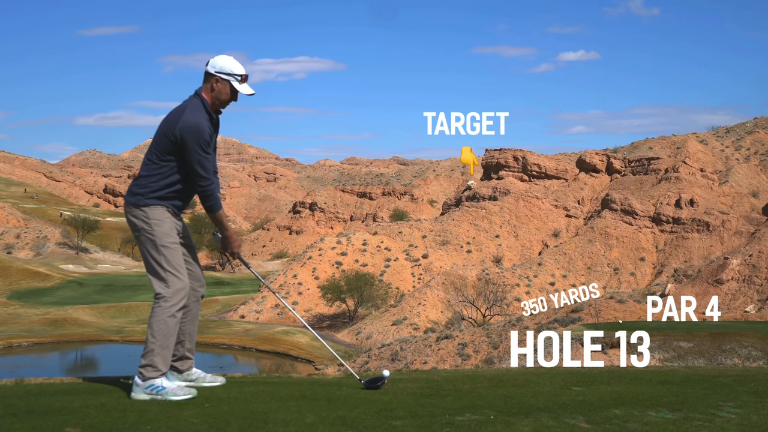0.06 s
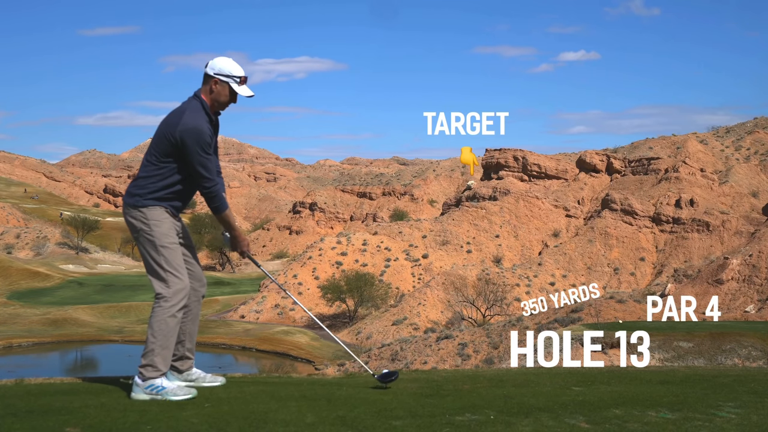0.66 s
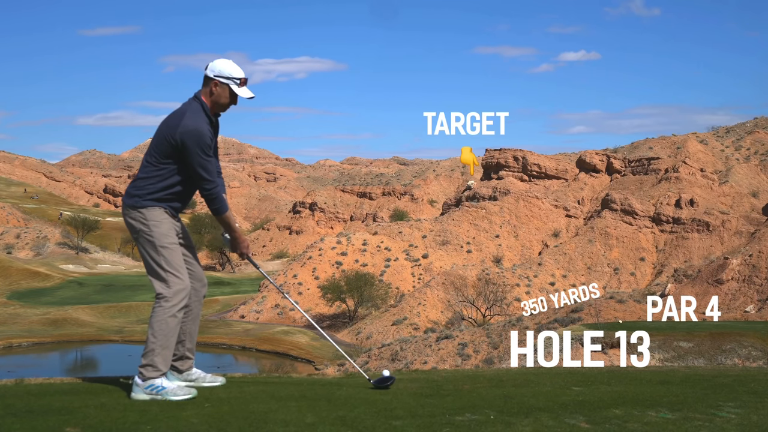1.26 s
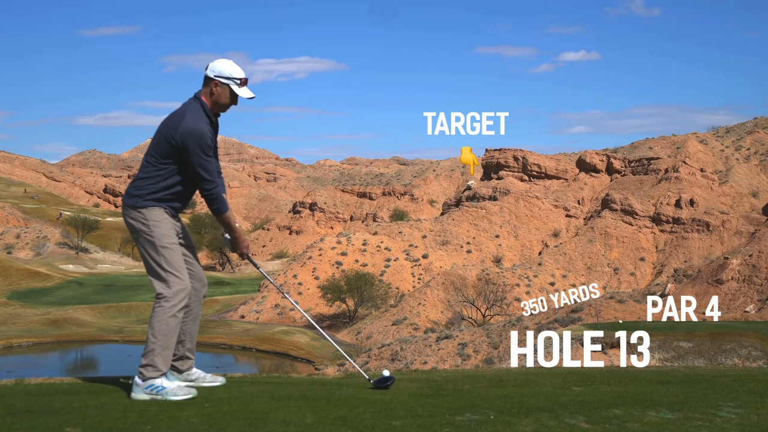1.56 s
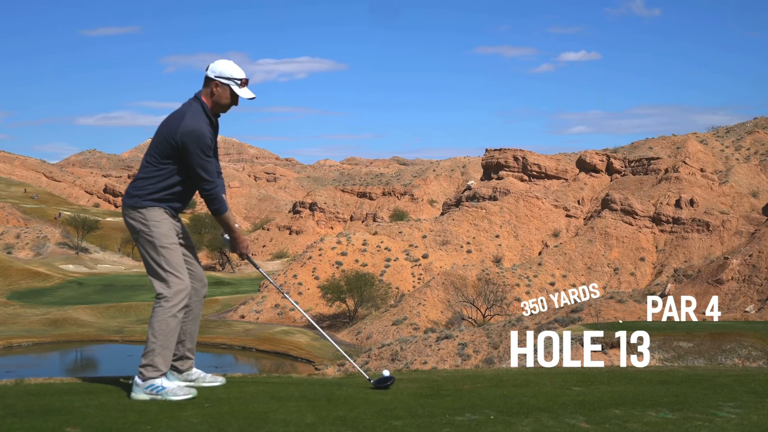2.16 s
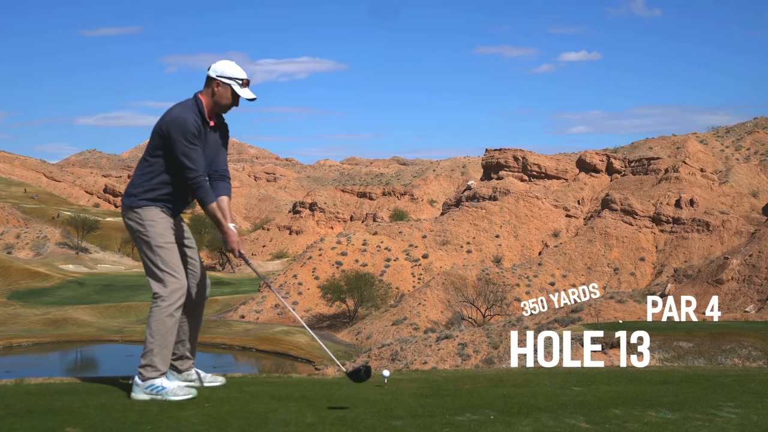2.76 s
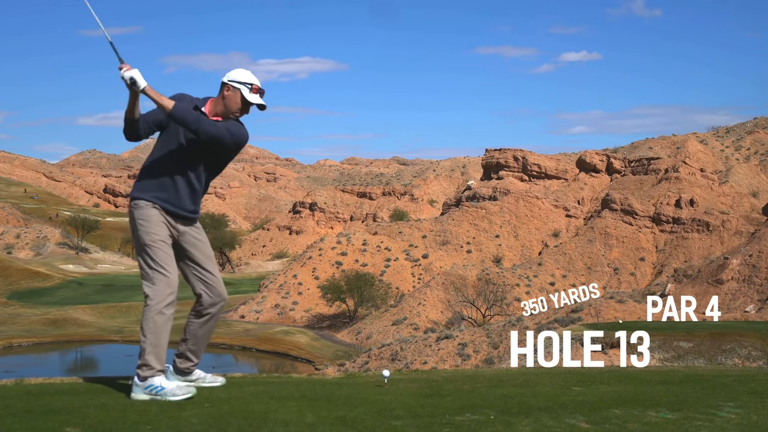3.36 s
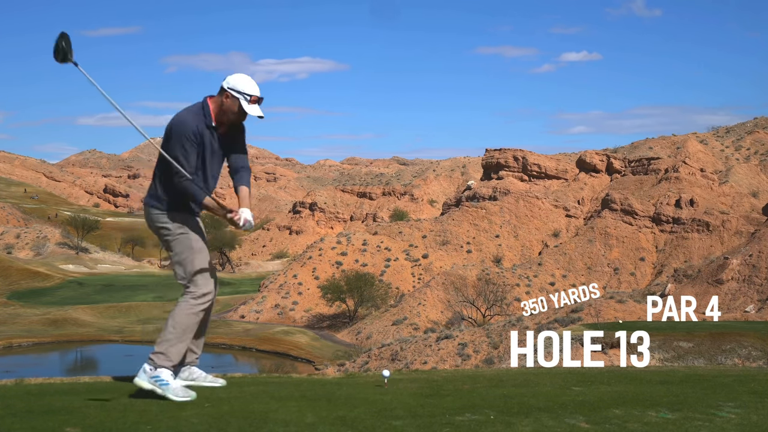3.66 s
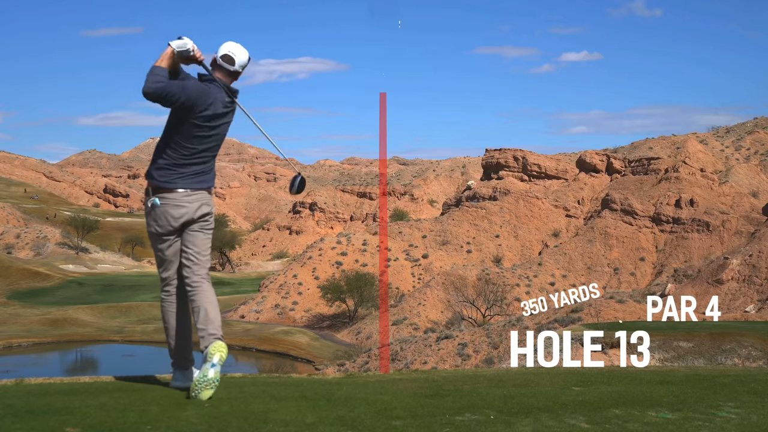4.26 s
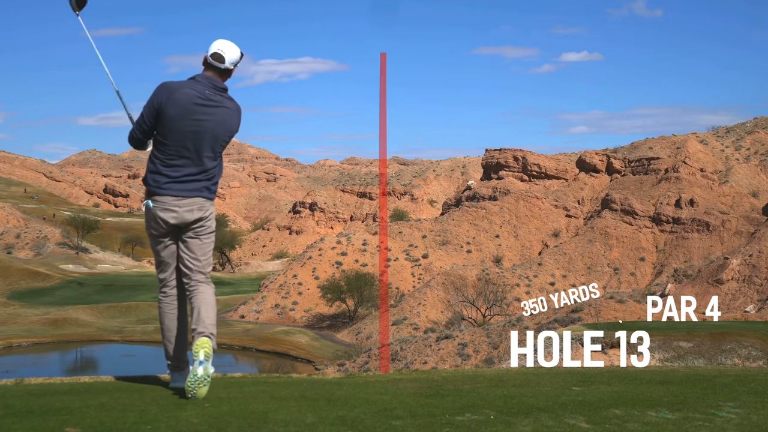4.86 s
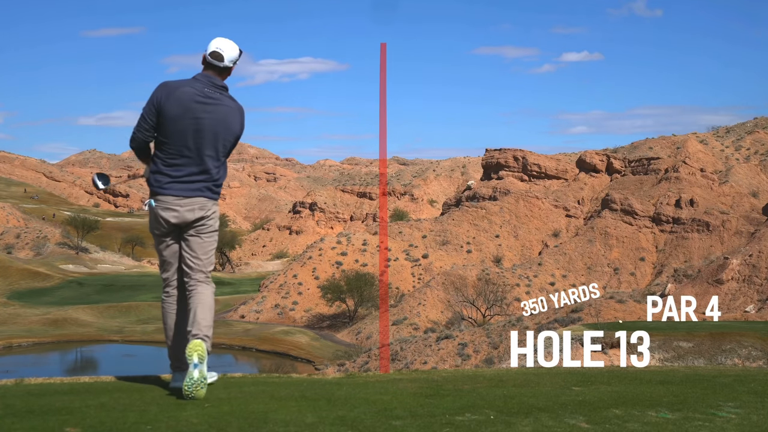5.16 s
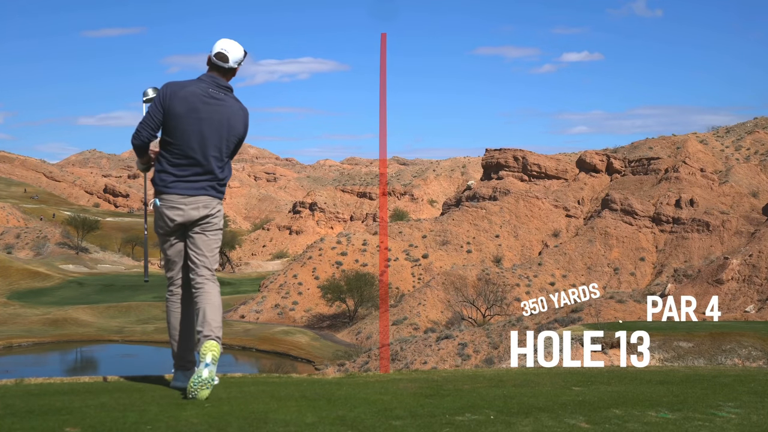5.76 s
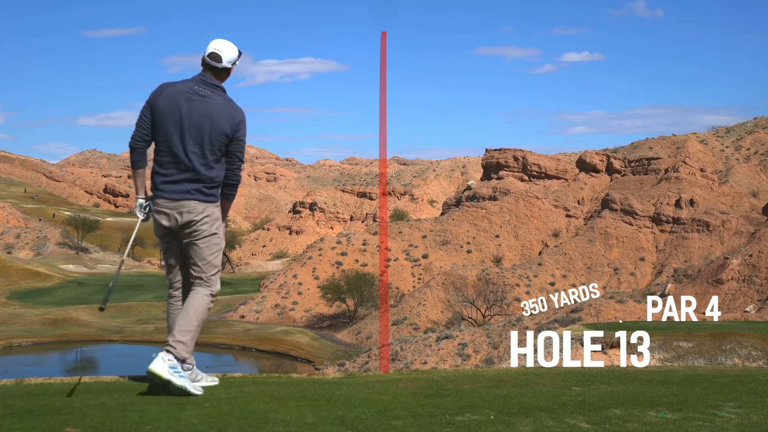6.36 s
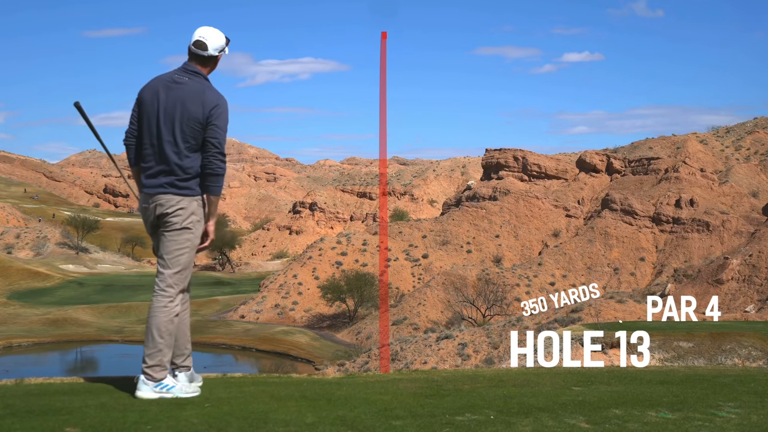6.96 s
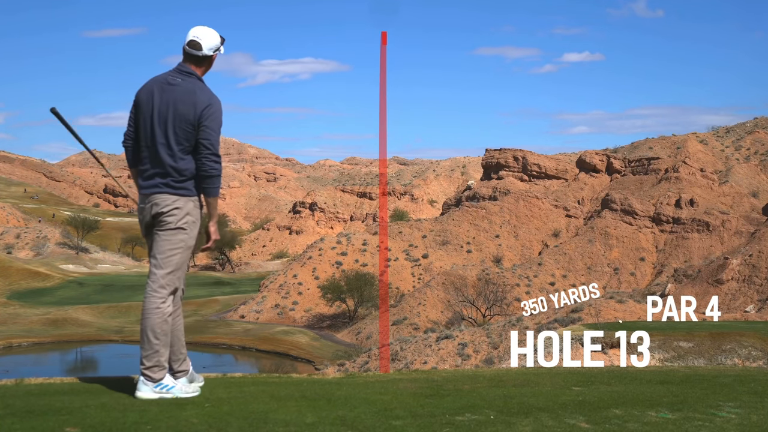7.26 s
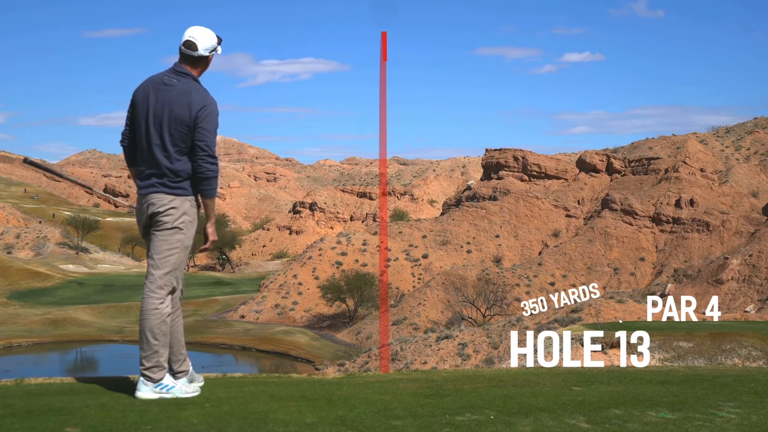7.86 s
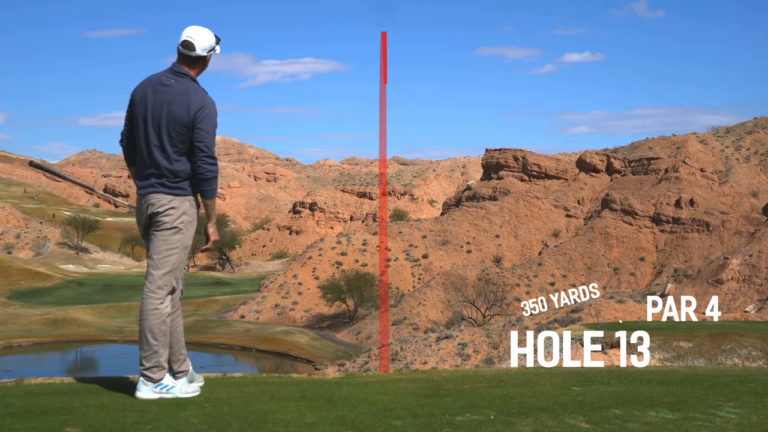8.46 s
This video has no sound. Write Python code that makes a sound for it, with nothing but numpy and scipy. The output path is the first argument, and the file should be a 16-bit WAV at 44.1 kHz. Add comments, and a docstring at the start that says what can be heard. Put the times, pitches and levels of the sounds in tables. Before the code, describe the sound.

On a quiet, open golf course, far engines drone over a low rumble while a small bird chirps softly. Close to the microphone, a driver swishes through the air and hits the ball with one loud, sharp metallic crack. The ball hisses away and rocky bluffs send back a faint echo. The golfer's shoes and clothes tick and rustle lightly, and the bird sings again near the end.

```python
"""A golf tee among desert bluffs, one microphone near the golfer. A driver's shaft swishes, the hollow
metal head cracks on the ball and its ring rises in pitch as it swings round; the ball hisses away,
the turf scatters the crack and the bluffs answer faintly. Close by, shoes and clothes tick and rustle.
A small bird sings softly, and far engines drone over a low rumble and a wash of distant air."""
import sys
import numpy as np
from scipy import signal
from scipy.fft import rfft, irfft, next_fast_len
from scipy.io import wavfile
from scipy.ndimage import map_coordinates

SR = 44100
rng = np.random.default_rng(int(sys.argv[2]) if len(sys.argv) > 2 else 0)


def generate_wav(sig):
    """Save sig (samples, or channels by samples) to the path in sys.argv[1] as 16-bit PCM at SR."""
    pcm = np.round(np.clip(np.atleast_2d(sig).T, -1, 1) * 32767).astype(np.int16)
    wavfile.write(sys.argv[1], SR, pcm)


N = 375291
T = np.arange(N) / SR
AGE = np.arange(SR // 2) / SR  # seconds since the start of a short sound
IMPACT_S = 3.5422


def amp(db):
    """Decibels to gain."""
    return 10 ** (np.asarray(db) / 20)


def unit(x):
    """Scales to rms 1."""
    return x / np.sqrt(np.mean(x ** 2) + 1e-20)


def bell(x, middle, width):
    """A smooth swell of height 1."""
    return np.exp(-((x - middle) / width) ** 2)


def follow(rows, t):
    """Each column of a curve at times t."""
    times, *columns = np.transpose(rows)
    return [np.interp(t, times, column) for column in columns]


def colour(points, hz):
    """Gain of a spectrum at the given frequencies."""
    f, db = np.transpose(points)
    return amp(np.interp(np.log(hz + 1), np.log(f), db))


def shaped(x, points):
    """Filters x by a spectrum."""
    size = next_fast_len(len(x))
    return irfft(rfft(x, size) * colour(points, np.fft.rfftfreq(size, 1 / SR)), size)[:len(x)]


def noise(points):
    """Steady noise of a given spectral shape, rms 1."""
    return unit(shaped(rng.standard_normal(N), points))


def wander(hz):
    """Smooth random drift up to about the given rate, rms 1."""
    size = next_fast_len(N)
    lowpass = np.exp(-(np.fft.rfftfreq(size, 1 / SR) / hz) ** 2)
    return unit(irfft(rfft(rng.standard_normal(size)) * lowpass, size)[:N])


def blurred_tone(hz, blur_hz):
    """A tone of wavering strength and phase, rms 1."""
    phase = 2 * np.pi * np.cumsum(hz * np.ones(N)) / SR
    return wander(blur_hz) * np.sin(phase) + wander(blur_hz) * np.cos(phase)


def moving_noise(gain, size=256):
    """Noise whose spectral shape is gain(Hz, s), kept near rms 1."""
    frames = dict(nperseg=size, noverlap=size * 3 // 4)
    hz, t, spectra = signal.stft(rng.standard_normal(N), SR, **frames)
    gains = gain(hz[:, None], t[None])
    return signal.istft(spectra * gains / np.sqrt((gains ** 2).mean(0)), SR, **frames)[1][:N]


def click(points, size=4096):
    """A minimum-phase click of a given spectral shape, peak 1."""
    log_gain = np.log(colour(points, abs(np.fft.fftfreq(size, 1 / SR))))
    pulse = np.fft.ifft(np.exp(signal.hilbert(log_gain).conj())).real
    return pulse / abs(pulse).max()


def add(mix, s, sound):
    """Mixes a sound in at s seconds."""
    part = mix[round(s * SR):][:len(sound)]
    part += sound[:len(part)]


def strike(speed_m_s=45, arc_rad=2.9, slowing_s=.13, thwack_db=6, rebound_db=-14, rebound_s=.0038):
    """The ball thwacks the face, and the hollow head rings while it swings on."""
    # modes of the head as heard at impact: f/Hz, level/dB, t60/s
    head_modes = [(2005, -37, .27), (3960, -24, .115), (2710, -13, 0.048), (2860, -20, .03),
                  (3540, -7.5, .028), (4200, -12, .045), (4450, -22, .03), (4640, -9, 0.048),
                  (5070, -8, .035), (5590, -8, .04), (5995, -13, .033), (6300, -17.5, .025),
                  (7365, -10.5, .025), (7875, -1.5, .016), (10000, -18, .015), (12100, -16.5, .015),
                  (13950, -23.5, 0.018)]
    # spectrum of the noise in the snap and clang: f/Hz, level/dB
    burst_spectrum = [(100, -24), (300, -9), (1000, -11), (1600, -10.5), (2100, -14.5), (3000, -2),
                      (4500, -2), (6000, 0), (8500, -5.5), (13000, -6), (15500, -13), (17000, -35)]
    # spectrum of the ball's contact: f/Hz, level/dB
    thwack = [(25, -60), (60, -40), (150, -17), (280, -6.5), (600, -5), (1100, -2.5), (1650, -4),
              (2100, -14.5), (4000, -29.5), (9000, -51)]
    snap_db, snap_t60, clang_db, clang_t60 = -2, .011, -19, .07
    # the head first flees the microphone, then turns upward: its pitch rises
    angle = arc_rad * (1 - np.exp(-AGE / slowing_s))
    doppler = (343 + speed_m_s) / (343 + speed_m_s * np.cos(angle))
    clock = np.cumsum(doppler) / SR
    ring = sum(amp(db - 60 * AGE / t60) * np.sin(2 * np.pi * (hz * clock + rng.random()))
               for hz, db, t60 in head_modes)
    ring += crown(clock)
    # a brief broadband snap opens the crack; a duller clang lingers
    burst = noise(burst_spectrum)[:len(AGE)]
    ring += amp(snap_db - 60 * AGE / snap_t60) * burst
    ring += amp(clang_db - 60 * AGE / clang_t60) * shaped(burst, [(6000, .5), (11000, -6)])
    ring *= np.minimum(AGE / .00013, 1) ** 2  # the ring builds while the ball is on the face
    add(ring, 0, -amp(thwack_db) * click(thwack))
    add(ring, rebound_s, amp(rebound_db) * click(thwack))  # thrown back by the ground near the tee
    out = np.zeros(N)
    add(out, IMPACT_S, ring)
    return out


def crown(clock, hz=2560, level_db=3, t60=.087, beat_hz=122, twin_db=-13):
    """The head's loudest mode beats with a close twin while its beam swings past the microphone."""
    facing_s, turn_s, averted_db = .0165, .005, -13
    lobe_top_s, lobe_period_s, lobe_db = .029, .026, 3.5
    beam_db = averted_db * (1 - np.tanh((AGE - facing_s) / turn_s)) / 2
    side_lobes_db = lobe_db * np.cos(2 * np.pi * (AGE - lobe_top_s) / lobe_period_s)
    flutter_db = wander(150)[:len(AGE)]
    gain = amp(level_db - 60 * AGE / t60 + beam_db + side_lobes_db + flutter_db)
    twin = amp(twin_db) * np.sin(2 * np.pi * (hz + beat_hz) * clock)
    return gain * (np.sin(2 * np.pi * hz * clock) + twin)


def swish(full_speed_db=-36.5, db_per_doubling=17, whistle_hz=5778, pass_s=3.509, push_hz=180):
    """The shaft's eddies rise with its speed; the passing head shoves the air and trails a wake."""
    # the swing: t/s, club speed/share of the fastest
    swing = [(3.3, .12), (3.41, 0.22), (3.441, .35), (3.47, 0.65), (3.483, 0.88), (3.512, 1), (3.545, .9),
             (3.6, 0.53), (3.7, 0.11)]
    # spectrum of the eddies at full speed: f/Hz, level/dB
    eddy_spectrum = [(60, -26), (150, -13), (350, -11), (800, -8), (1900, -12.5), (3000, -15.5),
                     (5500, -15), (8000, -24), (12000, -31), (16000, -39)]
    # spectrum of the air behind the head: f/Hz, level/dB
    wake_spectrum = [(60, -15), (150, 0), (400, -1), (900, -6), (2000, -11), (4000, -30)]
    speed = follow(swing, T)[0]
    swinging = (T > swing[0][0]) * (T < swing[-1][0])
    eddies = moving_noise(lambda hz, t: colour(eddy_spectrum, hz / follow(swing, t)[0]))
    eddies *= amp(full_speed_db + db_per_doubling * np.log2(speed)) * swinging
    # the eddy tone is clear only near a third of full speed, before the flow breaks up
    smooth_flow = bell(np.log2(speed), np.log2(.34), .45) * (T < IMPACT_S)
    whistle = amp(-57.5) * smooth_flow * blurred_tone(whistle_hz * speed, blur_hz=200)
    push = amp(-31) * bell(T, pass_s, .009) * np.sin(2 * np.pi * push_hz * (T - pass_s))
    wake = amp(-37.5) * bell(T, pass_s + .009, .019) * noise(wake_spectrum)
    return eddies + whistle + push + wake


def ball(level_db=-50, near_s=.09, fade_db_per_s=9, dulling_db_per_khz_s=1.53, ground_gain=.43):
    """The spinning ball hisses away; its ground echo lags more as it climbs, sweeping a comb down."""
    # spectrum of the ball leaving the tee: f/Hz, level/dB
    spectrum = [(150, -15), (500, -5.5), (1500, -5), (3000, -5), (6000, -10), (9000, -21.5), (15000, -17.5)]
    flight_s = np.maximum(T - IMPACT_S, 0)
    hiss = moving_noise(lambda hz, t: colour(spectrum, hz)
                        * amp(-dulling_db_per_khz_s * hz / 1000 * np.clip(t - IMPACT_S, 0, 2)))
    hiss *= (flight_s > 0) * amp(level_db - fade_db_per_s * flight_s) / (1 + flight_s / near_s)
    lag_s = .0004 + .0019 * flight_s
    return hiss + ground_gain * map_coordinates(hiss, [(T - lag_s) * SR], order=3)


def turf(level_db=-46, t60=.55):
    """The ground around the tee scatters the crack into a short dull tail."""
    # spectrum of the tail: f/Hz, level/dB
    spectrum = [(50, -6), (120, 0), (300, -4), (700, -10), (2000, -15), (4000, -29), (9000, -45)]
    since = np.maximum(T - IMPACT_S, 0)
    return (since > 0) * amp(level_db - 60 * since / t60) * noise(spectrum)


def bluffs(crack, doppler=1.16, treble_db_per_s=-9):
    """Rough rock faces send the crack back late, smeared and duller the farther off they stand."""
    # echoes reaching the microphone: t/s, level/dB, spread/s
    echoes = [(3.76, -52, 0.0081), (3.791, -52.5, 0.033), (3.97, -53, 0.036), (4.027, -49.5, 0.01),
              (4.158, -53, .008), (4.174, -54, 0.014), (4.226, -53.5, 0.012), (4.243, -51, 0.015),
              (4.286, -53.5, .012)]
    # colour of the long way through the air: f/Hz, gain/dB
    air_path = [(200, 14), (700, -8), (1500, 0), (3000, 2.5), (4400, -0.5), (6000, -37), (12000, -35)]
    # the head moves toward the bluffs, so they receive a higher pitch
    sent = np.interp(IMPACT_S + doppler * AGE, T, crack)
    paths = np.zeros(N)
    for s, db, spread_s in echoes:
        scatter = rng.standard_normal(len(AGE)) * np.exp(-AGE / spread_s)
        dulling = [(1800, 0), (3000, treble_db_per_s * (s - IMPACT_S))]
        add(paths, s, shaped(amp(db) * scatter / np.linalg.norm(scatter), dulling))
    return shaped(signal.fftconvolve(paths, sent)[:N], air_path)


def golfer(grain_db=1.3, scuff_s=4.387, scuff_db=-62, tick_octaves=1.1):
    """Near the microphone, cloth rustles, a shoe pivots on the turf, and shoes, grip and clothes tick."""
    # body movements: middle t/s, half length/s, level/dB
    moves = [(3.049, .3, -87), (3.6, .45, -75), (4.401, 0.44, -83), (5.42, 0.28, -83), (6.25, 0.29, -80.5),
             (6.78, .15, -83)]
    # spectrum of rubbing cloth: f/Hz, level/dB
    cloth = [(300, -10.5), (1500, 0.5), (3500, -1), (6500, -3.5), (10000, -14.5), (15000, -23)]
    # spectrum of the shoe's scuff: f/Hz, level/dB
    scuff = [(400, -12), (1200, -10), (1500, -1), (1750, -15), (3000, -19), (8000, -50)]
    # small ticks: t/s, level/dB, centre f/Hz, decay/s
    ticks = [(3.254, -53, 2700, .0015), (3.418, -65, 5000, .002), (4.584, -56.5, 1300, .002),
             (4.658, -60, 1700, .002), (4.716, -53.5, 750, .0045), (4.836, -51.5, 600, .003),
             (5.018, -54, 650, .003), (5.114, -72, 4500, .006), (5.141, -66, 4000, .0044),
             (5.16, -60, 3500, .0025), (5.239, -65, 5000, .003), (5.408, -63.5, 3200, .013),
             (5.429, -70, 3500, .01), (5.937, -65, 6000, .002), (6.015, -65, 2500, .0017),
             (6.169, -62.5, 1500, 0.0039), (6.833, -69, 2513, .002), (7.119, -65, 2200, .002),
             (7.773, -63, 2200, .002)]
    # softening of the ticks by cloth and turf: f/Hz, gain/dB
    muffle = [(5500, 6), (12000, -12)]
    motion = sum(amp(db) * bell(T, s, half_s) for s, half_s, db in moves)
    out = motion * amp(grain_db * wander(40)) * noise(cloth)
    out += amp(scuff_db) * bell(T, scuff_s, .03) * noise(scuff)
    hz = np.fft.rfftfreq(len(AGE), 1 / SR) + 1
    for s, db, centre_hz, decay_s in ticks:
        band = np.exp(-(np.log2(hz / centre_hz) / tick_octaves) ** 2 / 2)
        burst = irfft(rfft(rng.standard_normal(len(AGE))) * band * colour(muffle, hz))
        add(out, s, amp(db) * unit(burst) * np.exp(-AGE / decay_s))
    return out


def glide(length_s, from_hz, to_hz, bend=1, ease=1, waver=.021, waver_s=.004):
    """One near-pure whistle of the bird, sliding between two pitches as it swells and fades."""
    progress = np.linspace(0, 1, round(length_s * SR))
    drift = np.interp(progress * length_s / waver_s, np.arange(64), rng.standard_normal(64))
    slide = 1 - (1 - progress ** bend) ** ease
    hz = (from_hz + (to_hz - from_hz) * slide) * (1 + waver * drift)
    return np.sqrt(abs(np.sin(np.pi * progress))) * np.sin(2 * np.pi * np.cumsum(hz) / SR)


def bushes(x, scatter_db, scatter_s=.071):
    """Bushes and rocks add a short scatter on the way to the microphone."""
    tail = rng.standard_normal(len(AGE)) * np.exp(-AGE / scatter_s)
    return x + amp(scatter_db) * signal.oaconvolve(x, tail / np.linalg.norm(tail))[:N]


def bird_arches(low_hz=2647, leap_s=.025, break_s=.005, resume=.93):
    """Before the swing, the bird's whistle leaps up, breaks off at the top and falls back."""
    # arched notes: top t/s, top f/Hz, level/dB, fall/s
    notes = [(1.174, 3530, -74.5, .024), (1.34, 3300, -65, 0.026), (1.482, 3800, -64.5, 0.033),
             (1.631, 3580, -62.5, 0.019), (1.782, 3790, -60.5, 0.021), (1.929, 3650, -61, 0.02),
             (2.096, 3470, -63.5, 0.026), (2.236, 3370, -65, 0.032)]
    out = np.zeros(N)
    for s, top_hz, db, fall_s in notes:
        add(out, s - leap_s, amp(db) * glide(leap_s, low_hz, top_hz, bend=1.72))
        add(out, s + break_s, amp(db) * glide(fall_s, resume * top_hz, low_hz, bend=.9))
    return bushes(out, scatter_db=-12)


def bird_twitter(low_hz=2520, half_s=.028, break_s=.005, pip_s=.02336):
    """After the shot, a soft run of rounded notes, each broken at its top, then a few level pips."""
    # quick rolling notes: top t/s, top f/Hz, level/dB
    notes = [(4.32, 3700, -74.5), (4.385, 3500, -73), (4.445, 3550, -70.5), (4.5, 3600, -69),
             (4.56, 3750, -71), (4.62, 3800, -71), (4.68, 3800, -73), (4.745, 3650, -79)]
    # soft pips: t/s, f/Hz, level/dB
    pips = [(4.92, 3810, -78.5), (5.101, 3860, -77), (5.27, 3796, -77), (5.47, 3826, -75)]
    out = np.zeros(N)
    for s, top_hz, db in notes:
        add(out, s - half_s, amp(db) * glide(half_s - break_s, low_hz, top_hz, waver=.04))
        add(out, s + break_s, amp(db) * glide(half_s, top_hz, low_hz, waver=.04))
    for s, hz, db in pips:
        add(out, s - pip_s / 2, amp(db) * glide(pip_s, hz, hz))
    return bushes(out, scatter_db=-7)


def bird_slurs(lead_s=.052, pip_s=.021, pip_hz=3480, pip_db=-7, flick_s=.0073, dip_db=-9, knee=.83):
    """Each late note is a soft pip, a dip and flick to the top, then a long slide from the knee."""
    # slurred notes: top t/s, top f/Hz, level/dB, slide/s, end f/Hz
    notes = [(7.569, 4513, -66.5, 0.038, 2880), (7.714, 4530, -66, 0.042, 2870),
             (7.858, 4700, -65.5, 0.047, 3000), (7.993, 4840, -61.5, 0.042, 2900),
             (8.129, 4830, -63.5, 0.04, 2890), (8.258, 4810, -63.5, 0.045, 2870),
             (8.4, 4650, -63.5, 0.051, 2720)]
    out = np.zeros(N)
    for s, top_hz, db, slide_s, end_hz in notes:
        knee_hz = knee * top_hz
        add(out, s - lead_s, amp(db + pip_db) * glide(pip_s, pip_hz, pip_hz))
        add(out, s - 2 * flick_s, amp(db + dip_db) * glide(flick_s, top_hz, pip_hz))
        add(out, s - flick_s, amp(db) * glide(flick_s, pip_hz, top_hz, bend=1.5))
        add(out, s, amp(db) * glide(flick_s / 2, top_hz, knee_hz))
        add(out, s + flick_s / 2, amp(db) * glide(slide_s, knee_hz, end_hz, ease=1.5))
    return bushes(out, scatter_db=-16.5)


def engine(curve, orders, flutter_db):
    """Only the low orders of a far engine carry to the tee, each fluttering in the moving air."""
    hz, level_db = follow(curve, T)
    cycles = np.cumsum(hz) / SR
    out = np.zeros(N)
    for multiple, db in orders:
        gain = amp(level_db + db + flutter_db * wander(3.99))
        out += gain * np.sin(2 * np.pi * (multiple * cycles + rng.random()))
    return np.sqrt(2) * out


def far_engines():
    """Out on the course one engine drones on, a mower fades away and a cart comes into earshot."""
    # the droning engine: t/s, firing f/Hz, level/dB
    drone = [(0.0, 54.2, -55.5), (0.37, 54.55, -52.5), (1.35, 58.4, -54.5), (3.16, 59.83, -53),
             (4.94, 57.1, -51.5), (6.6, 50.5, -57), (8.4, 47.46, -57.5)]
    # the mower's and the cart's engines: t/s, cycle f/Hz, level/dB
    mower = [(0, 20.5, -57), (1.2, 21.3, -54), (2.2, 21.2, -61), (3.2, 20.2, -75), (8.5, 20, -95)]
    cart = [(0, 18.5, -85), (2.8, 18.5, -61), (4.6, 18.3, -60.5), (5.9, 17.5, -62), (7.4, 19.4, -62.5),
            (8.5, 19, -65)]
    # orders of each engine: multiple of its f, relative level/dB
    drone_orders = [(1, 0), (2, -11)]
    mower_orders = [(5, -1), (6, -12), (7, -7), (8, -8), (9, -16), (10, -11)]
    cart_orders = [(5, -3), (7, -8), (8, -6), (9, -9), (10, -7), (12, -13)]
    return (engine(drone, drone_orders, flutter_db=.8)
            + engine(mower, mower_orders, flutter_db=1.8)
            + engine(cart, cart_orders, flutter_db=1.8))


def far_whines():
    """Blurred tones of far machinery drift in and out."""
    # whining tones: start t/s, end t/s, f/Hz, blur/Hz, level/dB
    tones = [(.8, 2.3, 667, 14, -69.5), (0, 3.5, 660, 25, -77), (.8, 2.4, 472, 10, -75),
             (0, 2.1, 1000, 50, -76), (0, 3.3, 1335, 30, -82), (6.3, 7.5, 770, 10, -78),
             (7.5, 7.75, 720, 15, -76)]
    out = np.zeros(N)
    for start, end, hz, blur_hz, db in tones:
        progress = np.clip((T - start) / (end - start), 0, 1)
        swell = np.sqrt(abs(np.sin(np.pi * progress)))
        out += amp(db) * swell * blurred_tone(hz, blur_hz)
    return out


def air(rumble_db=-60, rumble_fall_db_per_s=.34, gust_s=7.82, hiss_db=-88, hiss_rise_db_per_s=1):
    """A lumpy rumble, swelled by one puff of wind, lies under a distant wash and a faint growing hiss."""
    # spectra of the low rumble, the distant wash and the high hiss: f/Hz, level/dB
    rumble_spectrum = [(20, -35), (32, -13), (45, 0.5), (70, 2.5), (100, -2), (160, -4.5), (220, -7),
                       (320, -15.5), (600, -54.5)]
    wash_spectrum = [(100, -10), (300, 1.5), (500, -1), (900, -5), (1400, -10.5), (2500, -18.5),
                     (3600, -27), (6000, -35), (12000, -56.5)]
    hiss_spectrum = [(900, -25), (1800, -1), (2800, -1.5), (3600, -13), (6000, -29)]
    # slow course of the wash: t/s, level/dB
    wash_level = [(0, -65.5), (1.4, -65), (3, -67.5), (5.7, -66.5), (6.7, -70.5), (8.5, -70)]
    gust_db = 4.5 * bell(T, gust_s, .15)
    lumps_db = 1.8 * wander(6)
    rumble = amp(rumble_db - rumble_fall_db_per_s * T + gust_db + lumps_db) * noise(rumble_spectrum)
    wash = amp(follow(wash_level, T)[0] + .77 * wander(3.1)) * noise(wash_spectrum)
    hiss = amp(hiss_db + hiss_rise_db_per_s * T) * noise(hiss_spectrum)
    return rumble + wash + hiss


def scene():
    """Swing, strike and flight over the quiet of the course, heard in mono from the tee."""
    crack = strike()
    shot = swish() + crack + turf() + ball() + bluffs(crack)
    engines = far_engines()
    rustle = golfer()
    bird = bird_arches() + bird_twitter() + bird_slurs()
    return (shot + rustle + bird + engines + far_whines() + air())[None]


def record(dry, hiss_db=-81, edge_hz=15900):
    """The microphone's preamplifier hisses and overloads on the crack; a low-pass cuts the top treble."""
    clipped = np.clip(dry + amp(hiss_db) * rng.standard_normal(dry.shape), -1, 1)
    lowpass = signal.firwin(255, edge_hz, window=("kaiser", 8), fs=SR)
    return signal.oaconvolve(clipped, lowpass[None], "same")


dry = scene()
out = record(dry)
generate_wav(out)
```